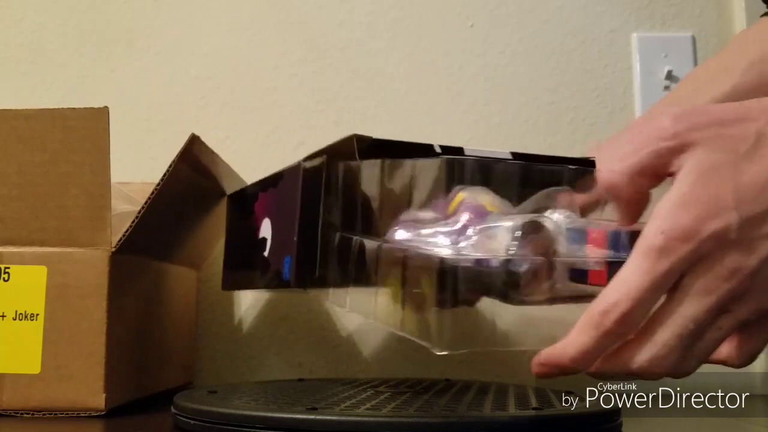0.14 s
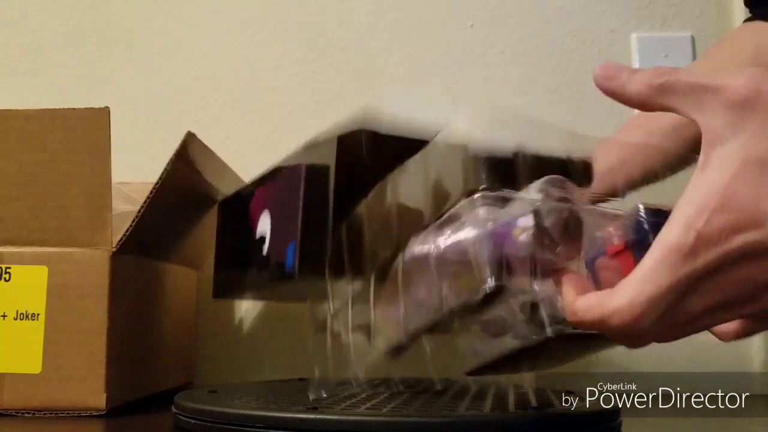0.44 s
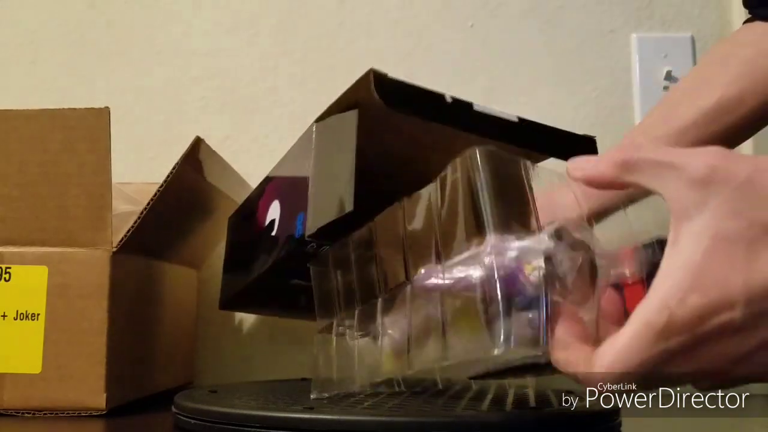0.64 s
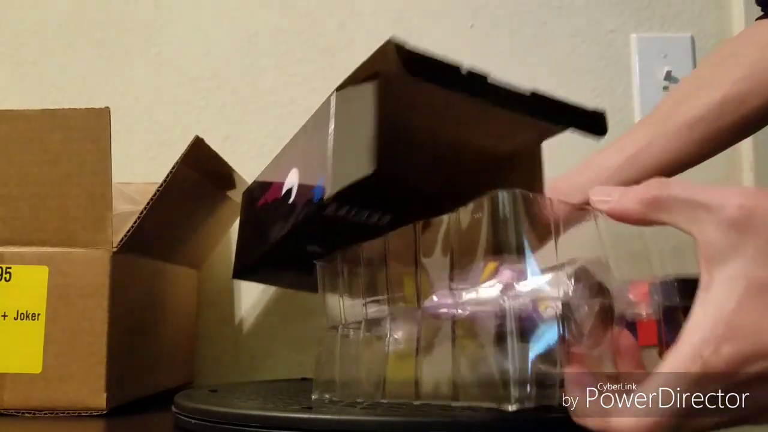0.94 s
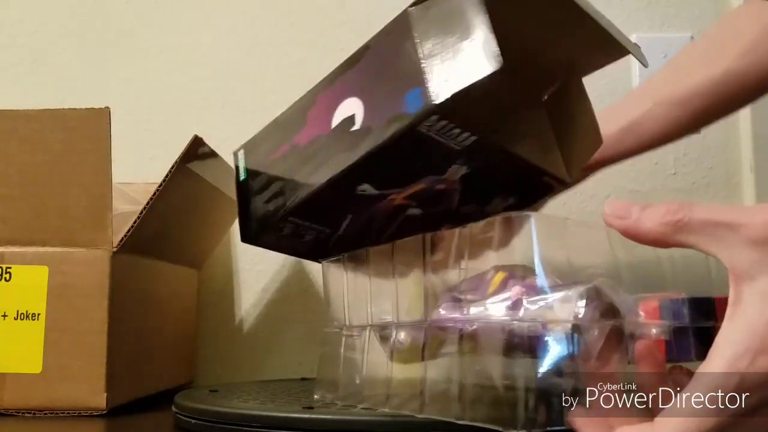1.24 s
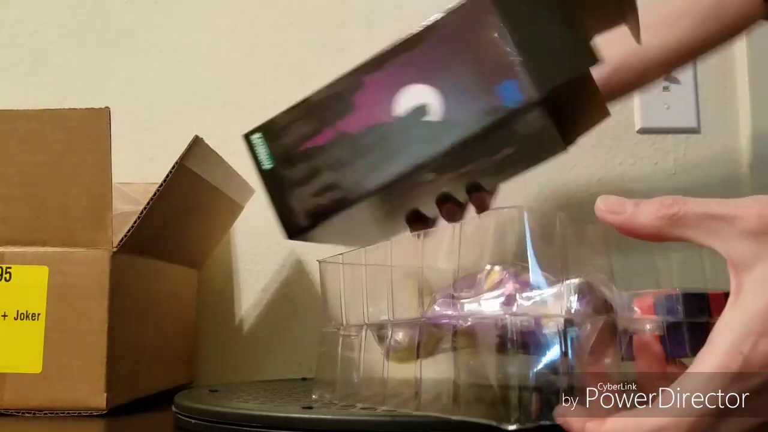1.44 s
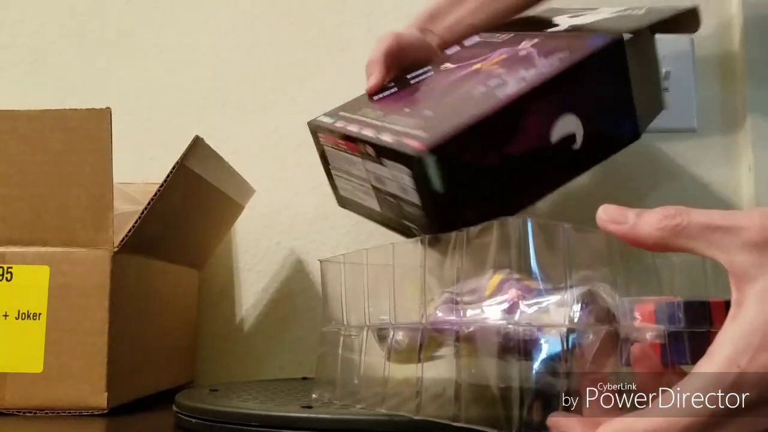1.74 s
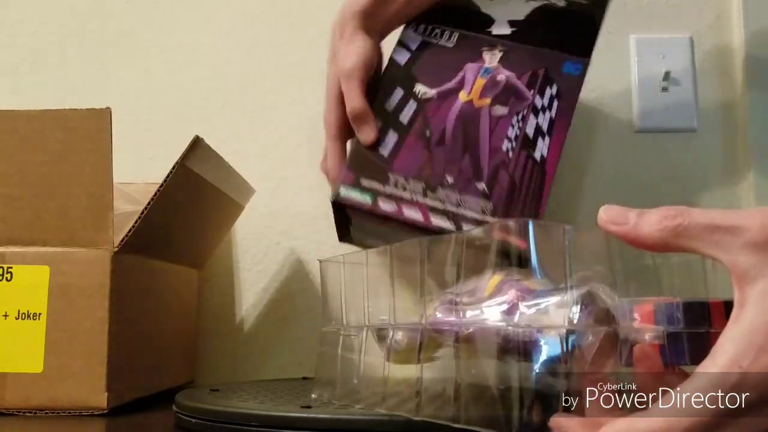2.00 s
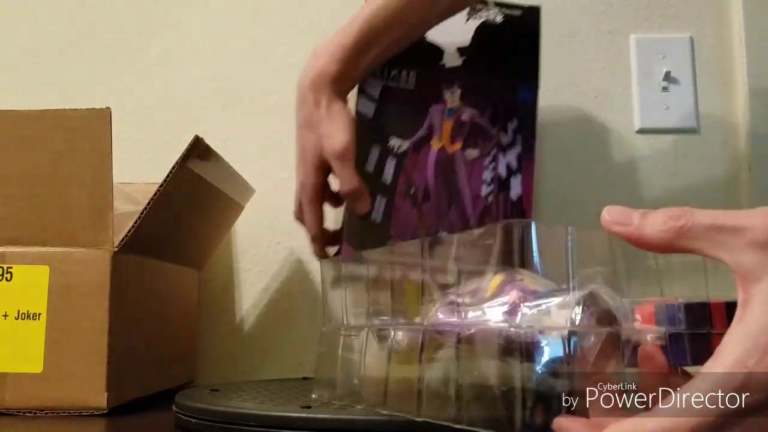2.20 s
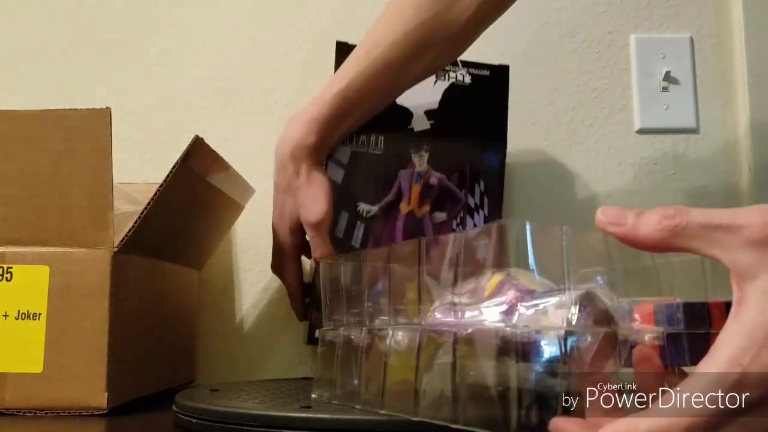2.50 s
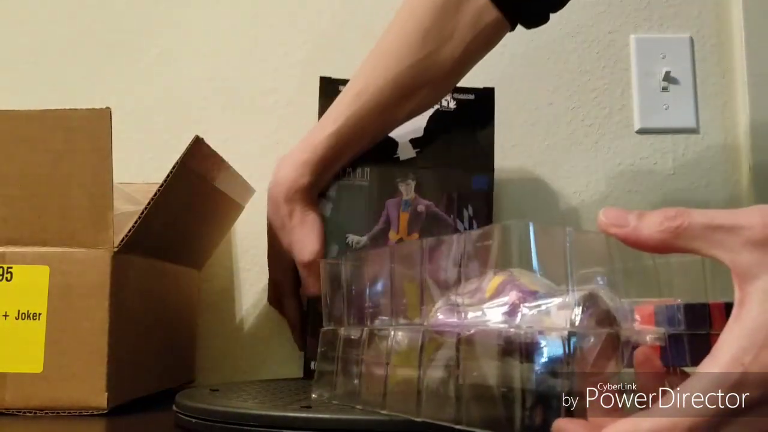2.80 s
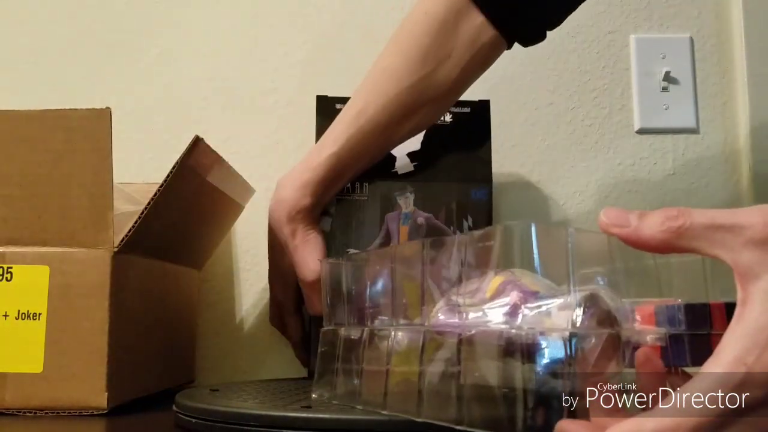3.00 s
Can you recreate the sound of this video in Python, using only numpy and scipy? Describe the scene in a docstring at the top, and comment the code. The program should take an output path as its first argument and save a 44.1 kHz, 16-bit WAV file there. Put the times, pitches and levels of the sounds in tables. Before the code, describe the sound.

A thin plastic tray scrapes and crackles out of a cardboard box for the first 0.8 seconds, loudest around 0.5, with hollow bumps and one tiny squeak. Separate plastic snaps follow near 1.3, 1.6, 1.8 and 2 seconds over faint finger rustling. The empty box is set down with hollow knocks around 2.4, 2.7 and 3 seconds. Everything is close, in a small, quiet room.

```python
"""A thin plastic tray is pulled out of a cardboard box, close by in a small room.
Its rim scrapes along the card in many tiny slips, crackles, squeaks once and pops free.
Its walls snap back one at a time, and each crack sets the plastic ringing briefly.
Fingers rustle as the empty box is turned over and set down with a few hollow knocks."""
import sys
import numpy as np
from scipy import signal
from scipy.fft import rfft, irfft, next_fast_len
from scipy.io import wavfile
from scipy.ndimage import map_coordinates

SR = 44100
rng = np.random.default_rng(int(sys.argv[2]) if len(sys.argv) > 2 else 0)


def int16_out(signal):
    """Quantize to a 16-bit WAV file."""
    q = np.round(np.clip(np.atleast_2d(signal).T, -1, 1) * 32767)
    wavfile.write(sys.argv[1], SR, q.astype(np.int16))


N = 138915

# how alike left and right sound, where 1 means the same (frequency [Hz], likeness [0-1])
STEREO_LIKENESS = [(40,0.46),(150,0.64),(500,0.88),(1200,0.39),(2300,0.69),(4000,0.074),(12000,0.066)]
# how much louder the left microphone is than the right (frequency [Hz], level [dB])
MIC_BALANCE = [(60, 0.5), (99, 8.5), (160, 3.5), (270, 1.0), (450, 2), (740, 0), (1220, 0), (2010, -1.5),
               (3330, -1.5), (5500, -6), (9080, 1), (15000, 3.5)]
# tone of the still air (frequency [Hz], level [dB])
AIR_TONE = [(8,-40.5),(25,-18),(50,-7),(130,-16),(200,-14.5),(550,-15.5),(1200,-21),(2300,-15.5),(5000,-27.5),(9000,-34),(12500,-21),(15000,-27)]
# the room's echo; a fade time is how long a sound takes to drop 60 dB (frequency [Hz], fade time [s])
ECHO_FADE = [(100,0.07),(300,0.26),(800,0.27),(1700,0.34),(4500,0.27),(8000,0.29),(14000,0.26)]
# tone of the echo (frequency [Hz], level [dB])
ECHO_TONE = [(100,-7),(400,1),(1700,0.5),(4000,0),(13000,2)]

# fingers shifting on box and tray (time [s], level [dB])
RUSTLE_LEVELS = [(.9,-60),(1.03,-50.5),(1.11,-43),(1.2,-58.5),(1.45,-52),(1.52,-56),(1.75,-53),(2.19,-54.5),(2.26,-48.5),(2.32,-57),(2.5,-56),(2.56,-54),(2.68,-63),(2.92,-58.5),(3.02,-47.5),(3.09,-51.5),(3.15,-46.5)]
# tone of the fingers' rustle (frequency [Hz], level [dB])
RUSTLE_TONE = [(60,-4),(140,1.5),(400,2),(900,-5),(2400,-14),(3200,-16),(7000,-20.5),(10000,-27.5),(15000,-23)]

# knocks of box and tray
# (time [s], thud [dB], hollow middle [dB], tap [dB], note pitch [Hz], note [dB], boom [dB])
KNOCK_EVENTS = [(0.286,-52,-37,-26.5,600,-38,-60.5), (0.3401,-34.5,-20,-30,510,-17,-26.5),
                (0.4332,-37,-25,-18.5,565,-19.5,-21.5), (0.48,-35,-24,-21.5,809,-27,-56),
                (0.557,-38,-35,-21,590,-24,-34), (0.603,-38.5,-20.5,-20,524,-21.5,-37.5),
                (1.165,-55,-48.5,-47,334,-42.5,-63), (2.214,-71,-42.5,-54,575,-46.5,-76),
                (2.244,-73,-40.5,-43.5,638,-54,-71), (2.256,-78,-46,-55,510,-56,-76),
                (2.4229,-38.5,-27,-40.5,440,-35,-38), (2.459,-44.5,-43,-55.5,250,-46,-47.5),
                (2.568,-74,-62.5,-68,624,-55.5,-75), (2.597,-58,-50,-63.5,487,-59,-70),
                (2.725,-37,-23.5,-31.5,513,-31.5,-42), (2.744,-36,-38,-42.5,602,-33,-42.5),
                (2.958,-37.5,-31.5,-38,238.6,-28,-40.5), (2.990,-47,-33,-36.5,773,-40,-42),
                (3.133,-61.5,-52,-51,494,-54,-60)]
# tone of knocked card (frequency [Hz], level [dB])
CARD_TONE = [(25,-23.5),(70,-12.5),(140,-7),(230,-1.5),(500,3.5),(850,-6.5),(1250,-18),(2500,-27),(3300,-30.5),(7000,-51.5),(15000,-36)]
# a knock's thud, hollow middle and tap (lowest [Hz], highest [Hz], fade time [s])
KNOCK_RANGES = [(40,156,0.43),(196,726,0.064),(726,9100,0.14)]

# the freed rim skimming the card (time [s], level [dB])
FIZZ_LEVELS = [(.1,-65),(.18,-53.5),(.33,-65),(.348,-39),(.44,-37),(.52,-48),(.56,-42.5),(.62,-49),(.72,-76),(.8,-110)]
# tone of that fine fizz (frequency [Hz], level [dB])
FIZZ_TONE = [(3000,-43.5),(9000,-17.5),(11000,-1),(13000,-1.5),(15500,-0.5)]
# the tray sliding on card (time [s], scrape [dB], hiss [dB], rumble [dB])
SLIDE_LEVELS = [(0,-26,-41.5,-39.5),(.08,-31,-49,-47),(.17,-24,-39,-51),(.25,-30.5,-46.5,-37),(.335,-34.5,-48,-57),(.35,-29.5,-37.5,-23),(.42,-28.5,-38,-39),(.455,-22.5,-34.5,-24.5),(.515,-30.5,-42,-37.5),(.57,-21,-33,-39.5),(.65,-23.5,-50,-41),(.71,-36,-62.5,-44),(.76,-39.5,-60,-50.5),(.80,-32.5,-46.5,-42),(.86,-57.5,-76,-56),(1.0,-79,-79,-63)]
# tone of the scrape (frequency [Hz], level [dB])
SCRAPE_TONE = [(88,-27.5),(150,-7),(300,-2),(589,-2),(1000,-4),(1430,-7),(2450,-8.5),(3200,-17),(4630,-19.5),(8920,-40.5),(15000,-43)]
# tone of the hiss above it (frequency [Hz], level [dB])
HISS_TONE = [(2500,-23.5),(4000,-1.5),(7500,-0.5),(9500,-9.5),(12500,-5.5),(15000,-8.5)]
# tone of the shaken box (frequency [Hz], level [dB])
RUMBLE_TONE = [(25,-31),(55,-19),(80,-4.5),(110,-8.5),(139,5),(162,-15.5),(230,-34),(600,-61),(2000,-100)]

# the notes the whole tray rings with (pitch [Hz], level [dB], fade time [s])
TRAY_NOTES = [(256,4.5,0.11),(328,-1,0.23),(406,-3.5,0.12),(509.4,4.5,0.13),(570.5,3.5,0.23),(751,1.5,.16),(830,8.5,.13),(1040,-3,0.42),(1153,-6.5,0.11),(1330,-13.5,0.094),(1683,-6,0.051),(1856,-13,0.067),(2480,-8,.12)]
# pings of the stiff creases (typical pitch [Hz], level [dB])
CREASE_NOTES = [(4280,3),(5250,-2.5),(6480,-13),(7250,-9),(12200,-7),(13250,-8.5)]
# tray walls buckling (time [s], body [dB], crack [dB], treble [dB], fold length [s], bulge pitch [Hz],
# panel pitch [Hz], panel over crack [dB], lingering edge pitch [Hz], edge over crack [dB])
SNAP_EVENTS = [(0.2369,-27,-31.5,-30,0.0027,364,545,-3,2310,-4),
               (0.3409,-21.5,-19.5,-24.5,0.005,613,1023,-0.5,1712,-6),
               (0.4623,-52,-35,-30,0.0022,300,736,-20,1820,-13),
               (0.492,-22.5,-23.5,-25.5,0.0078,324,833,-2.5,1910,-21),
               (0.5265,-24.5,-19,-24,0.0076,544,2010,-12,1764,-4.5),
               (0.6125,-30.5,-24,-25,0.00095,475,1107,-2,1508,-4),
               (0.6193,-40,-22,-26,0.0023,327,1655,-1,2517,-2),
               (0.668,-46,-23,-30.5,0.0034,325,818,-8,2195,-11),
               (0.7021,-53,-51,-44,.002,299,1190,-10,2400,-9),
               (0.7149,-50,-38,-47,.0033,294,1170,-14,2120,-14),
               (0.7326,-41,-33,-43.5,0.0011,298,997,-8,1720,-5),
               (0.7686,-39,-48,-47,0.0061,300,990,-3,2280,-7),
               (0.7742,-35,-35.5,-39.5,0.0012,478,950,-10,2170,-19),
               (0.782,-32.5,-30.5,-46,0.00071,330,590,-3.5,1740,-20),
               (0.8044,-34,-31,-38,.0017,319,850,-11,1550,-9.5),
               (0.9221,-45.5,-39,-41,0.0014,320,1030,-17,2240,-20),
               (0.9934,-54,-43.5,-42.5,0.0033,300,840,-2,1660,-8),
               (1.252,-40,-28,-35,0.0016,143,888,-12,1590,-15),
               (1.379,-56.5,-54.5,-60,0.003,292,830,-0.5,2180,-11),
               (1.4296,-56.5,-52.5,-56,0.0097,413,775,-3,2230,-16),
               (1.5473,-43,-46.5,-57.5,0.0044,406,1000,1,2620,-16),
               (1.6315,-30,-27.5,-35.5,0.0014,330,812,-2.5,1678,-4.5),
               (1.7915,-29,-25,-31,0.0049,279,798,2,1390,-6),
               (2.0157,-34.5,-28.5,-35,0.0044,437,1049,-1,1586,-2.5),
               (2.7497,-41,-33.5,-46.5,0.0028,300,858,-23,1816,-17.5),
               (2.9503,-36,-45.5,-52,0.0044,300,1054,1.5,2440,-8),
               (3.04,-46,-46,-55.5,0.0062,420,1017,-5.5,1760,-18)]
# tone of cracking plastic (frequency [Hz], level [dB])
CRACK_TONE = [(100,-5.5),(280,-0.5),(520,1.5),(1000,2),(1800,1),(2550,-2),(2950,-14),(3400,-15),(7300,-17.5),(9300,-26.5),(12500,-29),(15500,-19)]
# a snap's body, crack and treble (lowest [Hz], highest [Hz], fade time [s])
SNAP_RANGES = [(194,540,0.11),(680,2630,0.03),(2560,13000,0.028)]

RING_S = 0.4  # time allowed for one knock or snap to die away


def amp(db):
    """Turn decibels into a number to multiply by."""
    return 10 ** (np.asarray(db) / 20)


def unit(x):
    """Scale a sound to an average strength (rms) of 1."""
    return x / np.sqrt(np.mean(x ** 2) + 1e-20)


def along(points, hz):
    """Read between a table's (frequency, value) points, on a log scale of frequency."""
    freqs, values = np.transpose(points)
    return np.interp(np.log(hz + 1), np.log(freqs + 1), values)


def curves(rows):
    """Turn each column after the time into one value per sample."""
    times, *columns = np.transpose(rows)
    return [np.interp(np.arange(N) / SR, times, column) for column in columns]


def wobble(per_s):
    """A smooth curve through per_s random values a second."""
    return map_coordinates(rng.standard_normal(4096), [np.arange(N) * per_s / SR], mode="wrap")


def filtered(x, response):
    """Multiply each frequency in a sound by response(hz)."""
    n = x.shape[-1]
    padded = 2 * next_fast_len(n // 2 + 2048)
    return irfft(rfft(x, padded) * response(np.fft.rfftfreq(padded, 1 / SR)), padded)[..., :n]


def coloured(x, tone):
    """Shape a sound with a tone table, without smearing it earlier in time."""
    def response(hz):
        cepstrum = irfft(np.log(amp(along(tone, hz))))
        half = len(cepstrum) // 2
        cepstrum[1:half] *= 2  # move the filter's early half onto its late half
        cepstrum[half + 1:] = 0
        return np.exp(rfft(cepstrum))
    return filtered(x, response)


def spread(pair):
    """Blend two unrelated noises into left and right: alike in the bass, apart in the treble."""
    def weights(hz):
        angle = np.arccos(np.clip(along(STEREO_LIKENESS, hz), -1, 1)) / 2
        return np.array([np.cos(angle), np.sin(angle)])
    mid, side = filtered(pair, weights)
    return np.array([mid + side, mid - side])


def noise(tone):
    """Steady stereo noise with the given tone."""
    return unit(coloured(spread(rng.standard_normal((2, N))), tone))


def add(track, start_s, sound):
    """Mix a sound into a track at the given time."""
    part = track[:, int(start_s * SR):][:, :sound.shape[-1]]
    part += sound[..., :part.shape[-1]]


def blow(x):
    """Give a short sound as much energy as 0.01 s at full level."""
    return unit(x) * np.sqrt(0.01 * SR / x.shape[-1])


def burst(tone, ranges, levels_db, attack_s, hold_s):
    """A hit: noise that rises, holds, then fades at its own speed in each frequency range."""
    t = np.arange(int(0.14 * SR)) / SR
    grit = spread(rng.standard_normal((2, len(t))))
    out = np.zeros((2, int(RING_S * SR)))
    for (low, high, fade_s), db in zip(ranges, levels_db):
        shape = (1 - np.exp(-t / attack_s)) * amp(-60 * np.maximum(t - hold_s, 0) / fade_s)
        band = signal.butter(3, [low, high], "band", fs=SR, output="sos")
        hit = signal.sosfilt(band, coloured(grit * shape, tone))
        add(out, 0, amp(db) * blow(hit))
    return out


def ring(notes, attack_s, scatter_db=0):
    """A struck object: fading (pitch, level, fade time) notes, their levels varied by scatter_db."""
    t = np.arange(int(RING_S * SR)) / SR
    tones = np.zeros(len(t))
    for hz, db, fade_s in notes:
        level = amp(db + scatter_db * rng.normal() - 60 * t / fade_s)
        tones += level * np.sin(2 * np.pi * (hz * t + rng.random()))
    return blow(tones * (1 - np.exp(-t / attack_s)))


def friction(tone, slips_per_s, size_db, slip_s, smooth):
    """Rubbing: many tiny slips of uneven size on top of a smooth hiss."""
    slipping = rng.random(N) < slips_per_s / SR
    slips = slipping * amp(size_db * np.minimum(rng.exponential(size=N), 3))
    roughness = unit(signal.lfilter([1], [1, -np.exp(-1 / (slip_s * SR))], slips))  # each slip dies away
    rub = rng.standard_normal((2, N)) * (smooth + roughness)
    return unit(coloured(spread(rub), tone))


def still_air():
    """The faint, steady hush of the room."""
    return amp(-71.5) * noise(AIR_TONE)


def room_echo(x, level_db, build_up_s):
    """A small room's echo builds up quickly, then fades at its own speed at each frequency."""
    hz, t, spectrum = signal.stft(spread(rng.standard_normal((2, SR // 2))), SR, nperseg=256)
    fade = amp(-60 * t / along(ECHO_FADE, hz)[:, None])
    tail = signal.istft(spectrum * fade, SR, nperseg=256)[1]
    age_s = np.arange(tail.shape[1]) / SR
    tail *= 1 - np.exp(-(age_s / build_up_s) ** 2)
    tail = coloured(tail / np.linalg.norm(tail[0]), ECHO_TONE)
    return amp(level_db) * signal.fftconvolve(x, tail, axes=1)[:, :N]


def finger_rustle():
    """Fingers rub faintly on the box and tray."""
    level_db, = curves(RUSTLE_LEVELS)
    return amp(level_db - 8) * friction(RUSTLE_TONE, slips_per_s=220, size_db=2.5, slip_s=0.003, smooth=1)


def box_knocks():
    """Card is bumped or set down: a dull thud, a short hollow note and a boom of the air in the box."""
    boom_hz, boom_fade_s, note_fade_s = 137, 0.27, 0.065
    out = np.zeros((2, N))
    for start_s, thud_db, hollow_db, tap_db, note_hz, note_db, boom_db in KNOCK_EVENTS:
        thud = burst(CARD_TONE, KNOCK_RANGES, (thud_db, hollow_db, tap_db), attack_s=0.0022, hold_s=0.006)
        boom = amp(boom_db) * ring([(boom_hz, 0, boom_fade_s)], attack_s=0.025)
        note = amp(note_db) * ring([(note_hz, 0, note_fade_s)], attack_s=0.0093)
        add(out, start_s, thud + boom + note)
    return out


def rim_fizz():
    """The thin rim gives a flickering whisper as it skims out of the box."""
    level_db, = curves(FIZZ_LEVELS)
    return amp(level_db + 1.2 * wobble(per_s=70)) * noise(FIZZ_TONE)


def rim_squeak():
    """The rim sticks and slips on the card, giving one short falling squeak."""
    length_s, start_hz, fall_hz_per_s = 0.026, 1378, 1400
    t = np.arange(int(length_s * SR)) / SR
    phase = 2 * np.pi * np.cumsum(start_hz - fall_hz_per_s * t) / SR
    swell = np.sin(np.pi * t / length_s)
    out = np.zeros((2, N))
    add(out, start_s=0.547, sound=amp(-29.5) * unit(np.sin(phase) * swell))
    return out


def tray_slide():
    """The tray's rim scrapes along the card, rings the tray and shakes the box."""
    scrape_db, hiss_db, rumble_db = curves(SLIDE_LEVELS)
    rub = friction(SCRAPE_TONE, slips_per_s=1500, size_db=2.5, slip_s=0.0015, smooth=1)
    rub *= amp(0.8 * wobble(per_s=70))
    tray = ring(TRAY_NOTES, attack_s=0.001, scatter_db=-4.5)
    ringing = unit(signal.fftconvolve(rub, tray[None], axes=1)[:, :N])
    scrape = amp(scrape_db - 4.5) * (rub + amp(-14) * ringing)
    hiss = amp(hiss_db - 3.5) * friction(HISS_TONE, slips_per_s=450, size_db=4.5, slip_s=0.001, smooth=1.3)
    rumble = amp(rumble_db - 3.5) * noise(RUMBLE_TONE)
    return scrape + hiss + rumble


def crease_pings():
    """The creases ping very briefly; each fold has its own stiffness, which shifts the pitch a little."""
    pitch_shift, fade_s = np.exp(0.019 * rng.normal()), 0.014
    notes = [(hz * pitch_shift, db, fade_s) for hz, db in CREASE_NOTES]
    return np.array([ring(notes, attack_s=0.0005, scatter_db=1) for _ in range(2)])


def tray_snaps():
    """A wall creaks, then bulges and flips with a crack; panel, edge, creases and tray all ring."""
    panel_fade_s, bulge_fade_s, edge_fade_s = 0.04, 0.07, 0.03
    linger_db, linger_fade_s, creak_lead_s = -24, 0.3, 0.013
    out = np.zeros((2, N))
    for (start_s, body_db, crack_db, treble_db, fold_s,
         bulge_hz, panel_hz, panel_db, edge_hz, edge_db) in SNAP_EVENTS:
        levels_db = (body_db - 2, crack_db, treble_db)
        crack = burst(CRACK_TONE, SNAP_RANGES, levels_db, attack_s=0.00023, hold_s=fold_s)
        panel = amp(crack_db + panel_db) * ring([(panel_hz, 0, panel_fade_s)], attack_s=0.001)
        # the panel's free edge rings sharply, then lingers faintly at a slightly lower pitch
        edge_notes = [(edge_hz * 1.025, 0, edge_fade_s), (edge_hz, linger_db, linger_fade_s)]
        edge = amp(crack_db + edge_db) * ring(edge_notes, attack_s=0.00052, scatter_db=-4)
        bulge = amp(body_db - 3) * ring([(bulge_hz, 0, bulge_fade_s)], attack_s=0.0023)
        tray = amp(crack_db - 9) * ring(TRAY_NOTES, attack_s=0.0013, scatter_db=3.5)
        pings = amp(treble_db - 8.5) * crease_pings()
        add(out, start_s, crack + panel + edge + bulge + tray + pings)
        creak = burst(CRACK_TONE, SNAP_RANGES, (body_db, crack_db), attack_s=0.004, hold_s=creak_lead_s)
        add(out, start_s - creak_lead_s, amp(-22.5) * creak)
    return out


def scene():
    """Tray and box with the room's echo, over still air."""
    near = tray_snaps() + box_knocks() + tray_slide() + rim_squeak() + rim_fizz() + finger_rustle()
    return near + room_echo(near, level_db=-9.5, build_up_s=0.0063) + still_air()


def record(dry):
    """The left and right microphones each have their own tone, and the highest treble is cut off."""
    def response(hz, top_hz=15600):
        balance = amp(along(MIC_BALANCE, hz) * np.array([[0.5], [-0.5]]))
        return balance / np.sqrt(1 + (hz / top_hz) ** 160)
    return filtered(dry, response)


dry = scene()
out = record(dry)
int16_out(out)
```